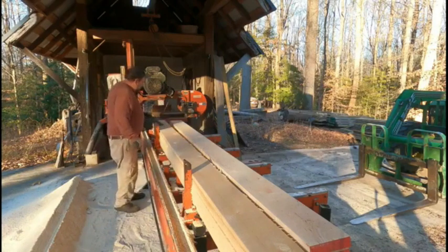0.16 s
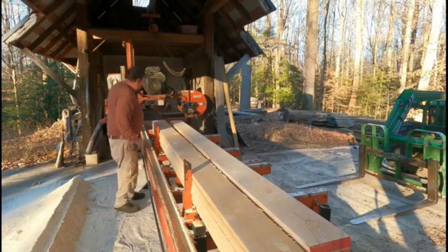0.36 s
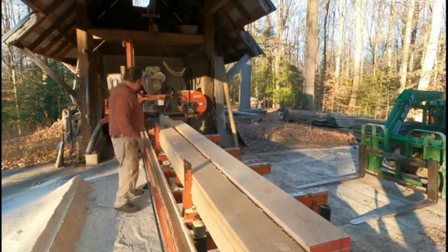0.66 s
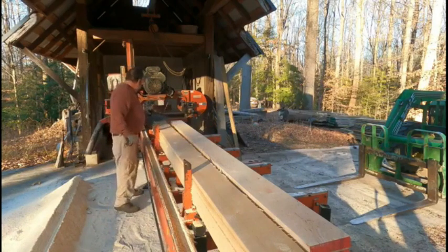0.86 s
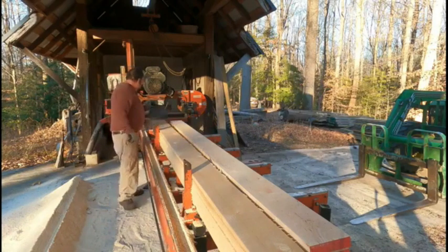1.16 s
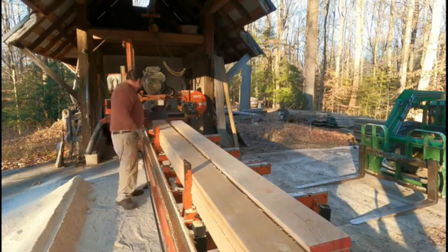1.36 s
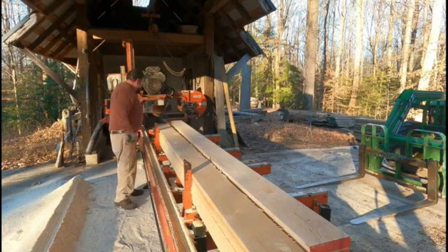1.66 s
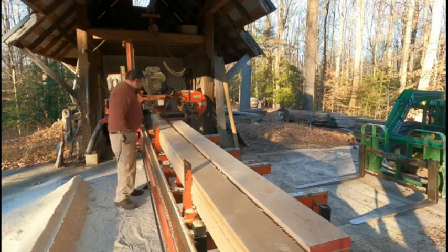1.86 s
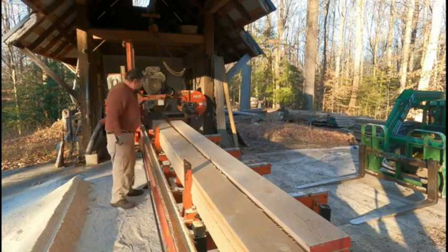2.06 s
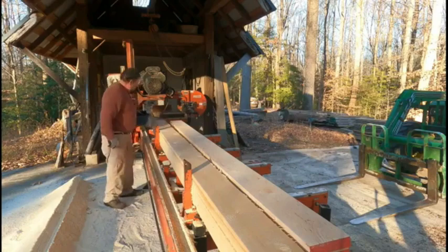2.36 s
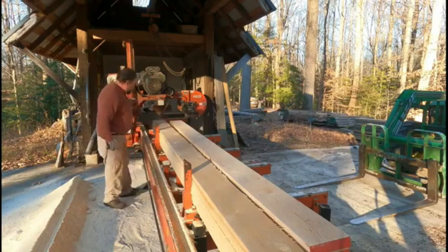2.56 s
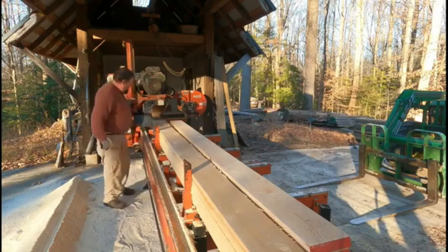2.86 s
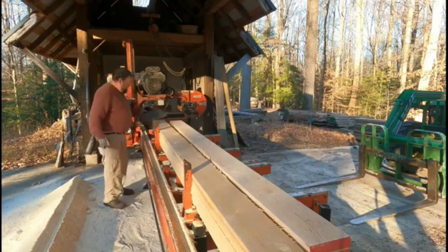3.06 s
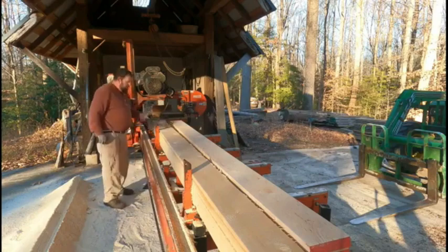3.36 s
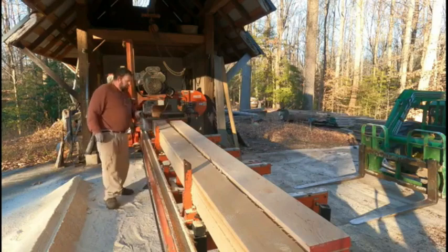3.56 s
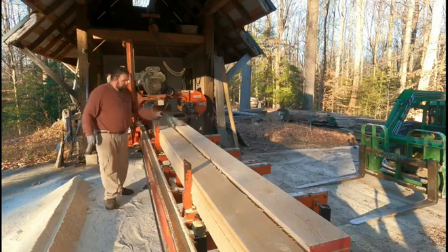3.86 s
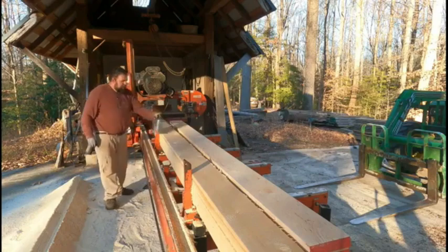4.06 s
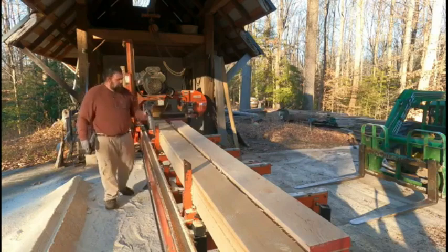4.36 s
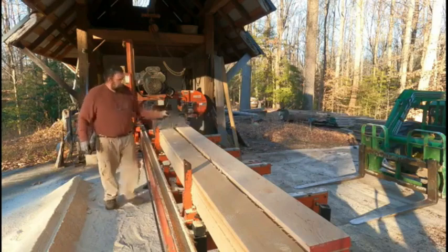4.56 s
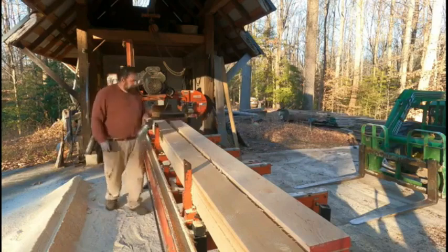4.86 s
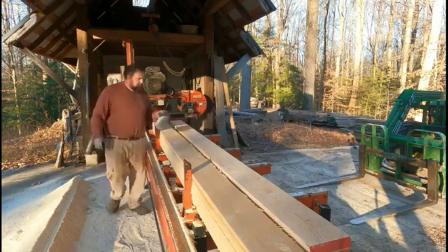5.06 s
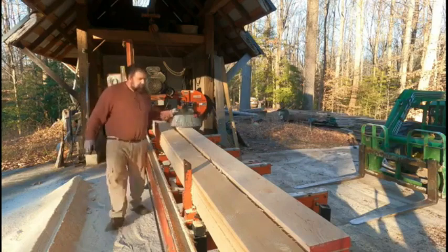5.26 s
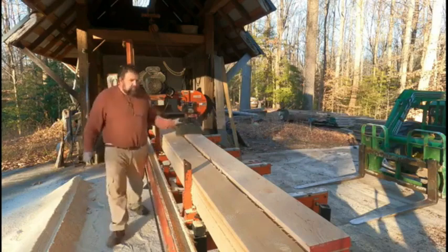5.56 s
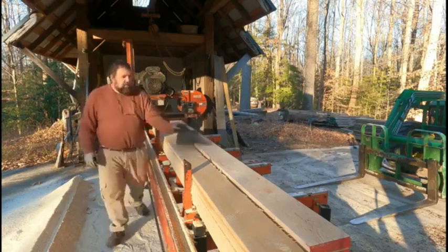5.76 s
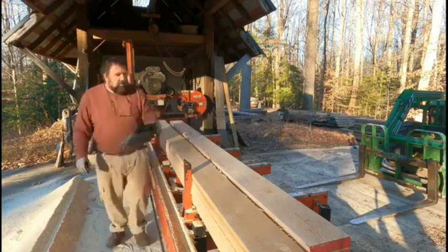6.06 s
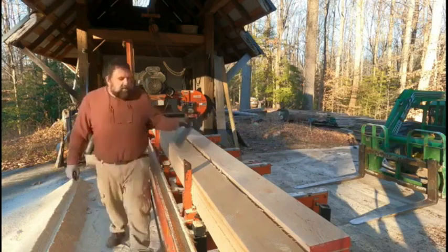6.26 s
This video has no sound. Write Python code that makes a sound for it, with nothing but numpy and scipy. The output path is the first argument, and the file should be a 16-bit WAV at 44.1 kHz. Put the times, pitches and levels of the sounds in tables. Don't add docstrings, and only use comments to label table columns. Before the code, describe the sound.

Outdoors by an open shed in quiet woods, a hand-held blade scrapes sawdust off a long sawn timber. About ten short strokes come irregularly, each opening with a woody knock and small bounces, then fizzing, rasping dust and light chatter. Soft boot scuffs fall between. Late on come a tiny squeak and dry snaps. The microphone hears it fairly close, with short faint echoes over breeze and distant drone.

```python
import sys
import numpy as np
from scipy import signal
from scipy.fft import rfft, irfft, next_fast_len
from scipy.io import wavfile
from scipy.ndimage import uniform_filter1d

SR = 44100
rng = np.random.default_rng(int(sys.argv[2]) if len(sys.argv) > 2 else 0)


def convert_level_to_amplitude(level_db):
    exponent = np.asarray(level_db, float) / 20
    return 10 ** exponent


def master(y):
    cut = np.clip(np.atleast_2d(y).T, -1, 1)
    pcm = np.round(cut * 32767)
    wavfile.write(sys.argv[1], SR, pcm.astype(np.int16))


N = 281799

# touch t/s, lift t/s, full-speed dust level/dB, rasp re dust/dB, chatter re dust/dB
STROKES = [(0.152, 0.346, -50, 2, -3), (0.762, 1.052, -46, 3, -2), (1.142, 1.377, -64.5, 17.5, 6.5),
           (1.592, 1.891, -50.5, -6.5, -9.5), (2.244, 2.457, -48, 2, -5), (2.762, 2.98, -53, 2.5, -1.5),
           (3.281, 3.555, -49.5, 4, -0.5), (3.971, 4.205, -48, 4, -2.5), (4.539, 4.666, -60, -6.5, -30),
           (4.768, 4.96, -46, 2.5, 1), (5.492, 5.986, -46, -1, -9)]
# start t/s, end t/s, dust level/dB, rasp re
# dust/dB, chatter re dust/dB
PUSHES = [
    (0.8, 0.95, -59, 12, 5),
    (1.07, 1.17, -77, 13, 10),
    (3.0, 3.12, -80, 2, 6.5),
    (3.99, 4.15, -53, 1.5, -3),
    (4.21, 4.3, -62, -2, -3),
    (4.29, 4.36, -73, -7, -4.5),
    (5.53, 5.7, -55, -4, -9),
    (5.88, 6.0, -48, -4, -5.5),
    (0.26, 0.35, -55, 3, -2),
]
# touch t/s, lift t/s, dust level/dB, rasp re dust/dB, chatter re dust/dB
SIFTS = [(0.025, 0.156, -95.5, 10, 22.5), (0.653, 0.77, -80, 2, 2), (1.434, 1.612, -79.5, 11, 9.5),
         (2.104, 2.25, -84.5, 11, 10), (2.742, 2.777, -79.5, 17, 18), (3.247, 3.284, -86.5, 9, 15),
         (3.71, 3.817, -83.5, -2.5, -10), (3.542, 3.713, -74, -1, 2.5), (4.4, 4.567, -85.5, 4, -4),
         (5.034, 5.065, -68, 10.5, 2.5), (5.08, 5.2, -78, 5.5, 2), (5.245, 5.314, -79.5, 4, 10),
         (5.3, 5.47, -82.5, -1, 2), (6.06, 6.2, -68, 10, 3), (6.153, 6.275, -80.5, -8, 3),
         (6.272, 6.346, -81.5, 1, -11), (6.341, 6.388, -82, 3, 7)]
# t/s, length/s, rasp level/dB, chatter level/dB, groan level/dB
JUDDERS = [(0.93, 0.043, -77, -63, -93), (1.0, 0.012, -55, -72, -86), (1.33, 0.085, -87.5, -69.5, -61),
           (1.8, 0.09, -46.5, -51.5, -89), (2.29, 0.046, -48.5, -54.5, -50), (3.465, 0.03, -48, -51, -65),
           (3.56, 0.027, -79, -87, -62.5), (4.19, 0.025, -64, -66, -54.5),
           (4.64, 0.08, -65.5, -68.5, -65.5), (4.785, .012, -85, -67, -53.5), (4.825, 0.015, -60, -54, -50),
           (4.895, 0.04, -50, -52, -55.5), (5.95, 0.063, -50, -54.5, -64), (6.12, 0.07, -70, -65, -59),
           (4.28, 0.036, -70, -83, -60.5), (5.045, 0.025, -74, -83, -64), (0.18, 0.032, -58, -55, -54),
           (4.03, 0.049, -61, -64, -64)]
# t/s, length/s, level/dB
HUMS = [
    (1.63, 0.018, -48),
    (4.0, 0.02, -64),
    (4.838, 0.01, -46),
    (4.9, 0.03, -50),
    (0.96, 0.035, -62),
    (2.25, 0.019, -56),
]
# t/s, blow level/dB, low modes level/dB, high modes level/dB, edge tick level/dB
TAPS = [(0.14, -27.5, -33, -4, -11.5), (0.751, -37.5, -45, -24, -27), (1.587, -19, -29, -14, -30),
        (2.186, -60, -25, -5, -15), (2.231, -20.5, -43, -10, -13.5), (2.761, -26, -24.5, -16.5, -13),
        (3.278, -24.5, -25.5, -24.5, -30), (3.971, -28.5, -15.5, -31, -15), (4.551, -65, -24, 3, 9.5),
        (4.696, -23, -12, -18.5, -11.5), (4.809, -25, -29, -26, -18), (5.477, -32.5, -13, -40, -9.5)]
# t/s, blow level/dB, low modes level/dB, high modes level/dB, edge tick level/dB
GRAZES = [
    (1.582, -29, -37, -8, -26),
]
# t/s, level/dB, f/Hz
BOUNCES = [(0.1422, -43.6, 1485), (0.1427, -41.0, 2411), (0.1487, -38.9, 1593), (0.1556, -41.5, 1550),
           (0.1566, -39.7, 1098), (0.1641, -41.1, 1098), (0.1701, -41.2, 1636), (0.7553, -43.4, 1205),
           (0.7603, -45.2, 1119), (0.7707, -49.6, 1291), (1.5889, -38.3, 2325), (1.5904, -25.1, 1141),
           (1.5929, -39.1, 2002), (1.5969, -35.0, 1399), (1.6004, -33.8, 1119), (1.6059, -30.9, 1055),
           (1.6118, -30.8, 1055), (1.6248, -35.5, 1055), (1.6318, -36.6, 1119), (2.2319, -36.0, 1636),
           (2.2324, -41.7, 3014), (2.2324, -32.9, 2024), (2.2374, -30.0, 1184), (2.2384, -40.6, 2045),
           (2.2489, -38.2, 1076), (2.7642, -45.7, 2411), (2.7657, -34.2, 1184), (2.7712, -43.8, 1701),
           (2.7777, -42.1, 1442), (2.7827, -39.4, 1055), (3.2795, -44.3, 2347), (3.28, -33.6, 1442),
           (3.29, -41.4, 1012), (3.2965, -42.5, 1399), (3.2965, -41.5, 1012), (3.4482, -39.1, 1894),
           (3.4766, -36.9, 1571), (3.4896, -38.8, 1571), (3.9725, -40.2, 1378), (3.974, -39.2, 990),
           (3.977, -39.6, 732), (3.9854, -41.9, 1184), (4.0074, -41.5, 1055), (4.6943, -40.4, 925),
           (4.6998, -35.5, 645), (4.7008, -36.9, 1119), (4.7033, -37.1, 1722), (4.7118, -37.9, 1550),
           (4.7193, -36.6, 1614), (4.8131, -36.0, 1658), (4.8225, -33.5, 1614), (4.836, -33.2, 990),
           (4.8445, -33.5, 1012), (4.8779, -38.0, 2196), (4.8799, -33.0, 1141), (4.8894, -34.0, 1033),
           (4.8994, -35.1, 1033), (4.9083, -34.5, 1033), (5.479, -38.5, 1184), (5.4835, -43.2, 581)]
# t/s, level/dB, f/Hz
TOUCHES = [(0.048, -67, 1350), (0.075, -66, 1440), (2.187, -62, 1340), (2.227, -52, 2100),
           (2.757, -56, 1320), (3.268, -58, 1130), (3.468, -40, 1600), (4.553, -62, 1760),
           (4.922, -38, 1500), (5.2501, -57, 1313), (5.2595, -56, 2060), (5.261, -60, 1421),
           (5.4845, -46, 1500), (5.491, -42, 1100), (5.505, -46, 1250), (6.076, -58, 1560),
           (6.364, -69, 1500), (1.5865, -30, 1200), (1.6175, -35, 1150), (1.642, -39, 1150),
           (1.598, -41, 2900), (1.609, -42, 2250), (4.8125, -38, 1150), (4.826, -39, 1050),
           (4.705, -47, 3700), (4.715, -42, 800), (4.745, -48, 700), (3.283, -42, 880), (5.515, -48, 900),
           (5.53, -50, 800), (0.146, -48, 3900), (2.269, -42, 1200), (4.19, -52, 380), (4.63, -56, 680),
           (4.717, -46, 2900), (4.735, -46, 950), (1.583, -46, 1700), (1.604, -40, 2600),
           (0.187, -44, 1150), (3.998, -44, 1400), (1.813, -40, 1600)]
# t/s, peak level/dB, length/s
SNAPS = [
    (5.034, -33, 0.0012),
    (6.1096, -27, 0.0018),
    (4.5525, -48, .001),
]
# t/s, length/s, heel thud level/dB, scuff level/dB
STEPS = [(0.2, 0.064, -51, -73), (0.94, 0.2, -69, -72.5), (1.38, 0.15, -91, -67), (1.67, 0.042, -56.5, -68),
         (1.87, 0.03, -57.5, -88), (2.29, 0.05, -60.5, -50.5), (2.43, 0.28, -62.5, -85),
         (3.33, 0.044, -66, -60), (3.62, 0.042, -60.5, -99), (4.21, 0.046, -68, -58.5),
         (4.62, 0.078, -68, -77), (4.71, 0.035, -79, -59.5), (4.92, 0.079, -57, -61),
         (5.08, 0.12, -61, -80), (5.61, .07, -57.5, -98), (5.97, 0.19, -71.5, -64.5),
         (6.16, 0.059, -58.5, -71)]
# t/s, length/s, level/dB
GUSTS = [(0.21, 0.19, -55), (1.04, 0.044, -58), (1.4, 0.031, -57), (1.67, 0.054, -59), (1.87, 0.023, -49.5),
         (2.33, 0.06, -59.5), (3.25, .07, -60), (3.61, 0.064, -57), (4.1, 0.084, -56), (4.34, 0.045, -58),
         (4.66, .07, -60), (4.92, 0.031, -56), (5.07, 0.049, -73), (5.6, 0.12, -63), (5.96, 0.16, -67.5),
         (0.75, 0.28, -64)]

# f/Hz, level/dB, t60 share of the ring
TIMBER = [(1004, 1, 1.9), (925, -4.5, 1.9), (1144, -14, 0.3), (1202, 5.5, 1), (1230, 0.5, 1.3)]
# f/Hz, level/dB, t60 share of the ring
TIMBER_LOW = [(495, -3, 0.25), (540, -4.5, 0.35), (584, 7, 1), (690, 18.5, 0.68), (768, -6, .6),
              (816, 5, .6)]
# f/Hz, level/dB, t60 share of the ring
TIMBER_MID = [(1316, -3.5, 1), (1340, -1.5, 0.29), (1564, 2.5, 0.3), (1481, 6, 0.36), (1700, -12, 0.86),
              (1776, 13, 0.31)]
# f/Hz, level/dB, t60 share of the ring
TIMBER_HIGH = [(1930, 5, 1), (2068, 10, 0.81), (2290, 13, 0.76), (2510, -2, 1), (2666, -1.5, 1.7),
               (2900, 2, 1), (3570, -19, 0.5)]

# f/Hz, level/dB per Hz
FIZZ = [(3500, -24.5), (4800, -8), (6700, -6), (7800, -11), (9200, -22), (11000, -38), (13500, -58)]
# f/Hz, level/dB per Hz
RASP = [(1400, -59), (1900, 0.5), (2400, -2.5), (3000, -2.5), (3700, -5), (4600, -13.5), (6000, -35),
        (9000, -69)]
# f/Hz, level/dB per Hz
SPARKLE = [(7500, -49), (9000, -5.5), (10500, -4), (12100, -4.5), (13200, -9), (14300, -15), (15500, -27)]
# f/Hz, level/dB per Hz
CHATTER = [(600, -74), (820, -12), (1000, 3.5), (1300, 6), (1600, 7), (1800, 2.5), (2300, -26), (5000, -62)]
# f/Hz, level/dB per Hz
GROAN = [(380, -11.5), (500, -0.5), (670, 1.5), (830, -10), (1000, -34.5)]
# f/Hz, level/dB per Hz
HUM = [(900, -37), (975, -3), (1005, -4), (1040, -1), (1120, -53)]
# f/Hz, level/dB per Hz
TICK = [(1500, -28), (3000, -9), (5500, 14), (7500, 8), (10000, -6), (15000, -34.5)]
# f/Hz, level/dB
KNOCK_CUT = [(600, -36), (930, 0), (3200, 0), (4300, -24)]
# f/Hz, level/dB
LOW_CUT = [(280, -36), (470, 0), (900, 0), (1300, -20)]
# f/Hz, level/dB per Hz
SNAP = [(900, -30), (1600, 0), (3000, 5.5), (6500, 0), (9000, -20), (15000, -40)]
# f/Hz, level/dB per Hz
SCUFF = [(80, -37), (150, -3), (230, 7.5), (300, 12), (420, 4.5), (560, -85)]
# f/Hz, level/dB per Hz
THUD = [(45, -32), (62, 18.5), (100, 6), (135, 11.5), (170, -37.5)]
# f/Hz, t60/s
SHED = [(300, 0.18), (1000, 0.18), (3000, 0.1), (8000, 0.074), (15000, 0.24)]
# f/Hz, level/dB
SIDEWAYS = [(200, -9.5), (600, -1.5), (1200, -5.5), (2500, 4.5), (5000, 0.5), (9000, -1.5), (13000, -0.5)]
# f/Hz, left re right/dB
BALANCE_DB = [(60, -23.5), (110, -1.5), (200, -4), (380, -2), (700, -1.2), (1290, 0.0), (2380, 0),
              (4400, 0.0), (8120, 2), (15000, -0.5)]
# f/Hz, level/dB per Hz
BUFFET = [(10, -13), (22, 22.5), (35, 23.5), (55, 17), (75, -49.5)]
# f/Hz, level/dB per Hz
AIR = [(90, -18), (125, -20.5), (160, 15), (215, -19), (330, -10), (560, -16), (800, -20), (1250, -17),
       (1900, -26), (3900, -33.5), (5600, -29), (7400, -36), (9500, -45), (13000, -76.5)]
# f/Hz, correlation
AIR_SAME = [(60, 1), (130, 1), (290, 0.28), (640, 0.11), (1410, 0.14), (3100, 0.18), (6820, 0.71),
            (15000, 0.057)]

# (top as share of stroke, climb/dB, sag/dB)
DUST_ARCH, RASP_ARCH, CHATTER_ARCH = (0.95, 19.8, 3.7), (0.76, 30, 3.5), (0.62, 30, 4.3)
SIFT_ARCH = (0.54, 9.8, 7.3)
ARCH_POWER, TOUCH_S = 2.15, 0.0079
LIFT_DB_PER_S, TRICKLE_DB, TRICKLE_DB_PER_S = 312, -41.5, 102
# (level/dB at a -27 dB blow, share of blow dB, fall/dB per s)
SETTLE_DUST, SETTLE_RASP = (-66.5, 1, 290), (-48.5, 0.72, 224)
SETTLE_CHATTER, SETTLE_GROAN = (-43, 0.6, 260), (-41.5, 0.21, 160)


def evened(x):
    return x / np.sqrt(np.mean(x ** 2) + 1e-20)


def read(points, hz):
    f, value = np.transpose(points)
    return np.interp(np.log(hz + 1), np.log(f + 1), value)


def add(mix, s, sound):
    part = mix[round(s * SR):][:len(sound)]
    part += sound[:len(part)]


def colour(x, points, share=1):
    length = x.shape[-1]
    size = next_fast_len(length)
    gain = convert_level_to_amplitude(share * read(points, np.fft.rfftfreq(size, 1 / SR)))
    return irfft(rfft(x, size) * gain, size)[..., :length]


def swells(rows, column):
    t = np.arange(0, N, 32) / SR
    slow = sum(convert_level_to_amplitude(row[column]) * np.exp(-((t - row[0]) / row[1]) ** 2) for row in rows)
    return np.interp(np.arange(N) / SR, t, slow)


def stroked(rows, arch, column):
    top, climb_db, sag_db = arch
    out = np.zeros(N)
    for row in rows:
        length = row[1] - row[0]
        t = np.arange(0, length + .5, 1 / SR)
        u, after = np.minimum(t / length, 1), np.maximum(t - length, 0)
        climb = -climb_db * abs(1 - u / top) ** ARCH_POWER
        sag = -sag_db * ((u - top) / (1 - top)) ** 2
        arc_db = np.where(u < top, climb, sag)
        lift = convert_level_to_amplitude(-LIFT_DB_PER_S * after) + convert_level_to_amplitude(TRICKLE_DB - TRICKLE_DB_PER_S * after)
        over_db = row[column] if column > 2 else 0
        add(out, row[0], convert_level_to_amplitude(row[2] + over_db + arc_db) * lift * np.minimum(t / TOUCH_S, 1))
    return out


def moving(arch, column):
    return np.hypot(stroked(STROKES, arch, column), stroked(list(PUSHES) + list(SIFTS), SIFT_ARCH, column))


def settling(rule, low_share=0):
    db, share, fall_db_per_s = rule
    out, t = np.zeros(N), np.arange(0, .3, 1 / SR)
    for s, blow_db, low_db, *_ in TAPS:
        level_db = db + share * (blow_db + 27) + min(blow_db + 50, 0) + low_share * low_db
        add(out, s, convert_level_to_amplitude(level_db - fall_db_per_s * t) * np.minimum(t / TOUCH_S, 1))
    return out


def louder(modes, by_db):
    return [(hz, db + by_db, share) for hz, db, share in modes]


def ring(modes, t60_s, strike_db, detune):
    hz, db, share = np.transpose(modes)[:, :, None]
    t = np.maximum(np.arange(12000) / SR - .001, 0)
    decay = convert_level_to_amplitude(db + strike_db[:, None] - 60 * t / (share * t60_s))
    return (decay * np.sin(2 * np.pi * hz * detune[:, None] * t)).sum(0)


def grit(per_s, spread_db, clump_db, clump_s):
    size = convert_level_to_amplitude(spread_db * np.minimum(rng.exponential(1, N), 5)) * rng.standard_normal(N)
    clumps = evened(uniform_filter1d(rng.standard_normal(N), max(int(clump_s * SR), 2)))
    return size * (rng.random(N) < per_s / SR) * convert_level_to_amplitude(clump_db * clumps)


def dust_grains():
    fizz = moving(DUST_ARCH, column=2) + settling(SETTLE_DUST) + convert_level_to_amplitude(-99)
    rasp = moving(RASP_ARCH, column=3) + settling(SETTLE_RASP) + swells(JUDDERS, column=2)
    dust = grit(14000, 0.51, 0.8, 0.015)
    grains = fizz * evened(colour(dust, FIZZ)) + convert_level_to_amplitude(-4.44) * rasp * evened(colour(dust, RASP))
    finest = convert_level_to_amplitude(-13.5) * fizz * (fizz / convert_level_to_amplitude(-48.5)) ** 0.32
    return grains + finest * evened(colour(dust, SPARKLE))


def blade_chatter():
    steady = moving(CHATTER_ARCH, column=4)
    shake = steady + settling(SETTLE_CHATTER) + swells(JUDDERS, column=3)
    flex = convert_level_to_amplitude(-26) * steady + settling(SETTLE_GROAN, low_share=0.54)
    flex = flex + swells(JUDDERS, column=4) + convert_level_to_amplitude(-88.5)
    slips = grit(5000, 1.1, 0.82, 0.012)
    modes = list(TIMBER) + list(TIMBER_MID)
    body = ring(modes, 0.23, np.zeros(len(modes)), np.ones(len(modes)))
    rung = colour(signal.oaconvolve(slips, body)[:N], CHATTER, 0.37)
    chatter = evened(colour(slips, CHATTER)) + 0.18 * evened(rung)
    groan = convert_level_to_amplitude(-4.5) * flex * evened(colour(slips, GROAN))
    hum = swells(HUMS, column=2) * evened(colour(slips, HUM))
    return shake * evened(chatter) + groan + hum


def taps(contact_s=0.0033, settle_s=0.039, ring_s=0.025):
    out, rows, count = np.zeros(N), list(TAPS) + list(GRAZES), len(TIMBER_LOW)
    total = count + len(TIMBER) + len(TIMBER_MID) + len(TIMBER_HIGH)
    spots = rng.standard_normal((len(rows), 2, total))
    rough = rng.standard_normal((len(rows), 2, 4096))
    t = np.arange(4096) / SR
    blow = (t / contact_s * np.exp(1 - t / contact_s)) ** 2
    landing = blow + 0.5 * np.exp(-t / settle_s) * (1 - np.exp(-t / contact_s))
    tick_shape = np.exp(-t / 0.016) * (1 - np.exp(-t / 0.0073))
    fade = np.hanning(18000)[9000:]
    for (s, db, low_db, high_db, tick_db), (strike, tune), (a, b) in zip(rows, spots, rough):
        strike_db, detune = 2.4 * strike, 1 + 0.0099 * tune
        mid = louder(TIMBER_MID, 3 + 0.75 * high_db)
        stiff = list(TIMBER) + mid + louder(TIMBER_HIGH, high_db + 8.0)
        deep = ring(louder(TIMBER_LOW, low_db + 4), ring_s, strike_db[:count], detune[:count])
        high = ring(stiff, ring_s, strike_db[count:], detune[count:])
        modes = colour(high, KNOCK_CUT) + colour(deep, LOW_CUT)
        knock = signal.fftconvolve(a * landing, modes[:9000] * fade)
        tick = colour(b * tick_shape, TICK)[:3400]
        add(out, s - .0035, convert_level_to_amplitude(db - 9) * knock / abs(knock).max())
        add(out, s - .0004, convert_level_to_amplitude(db + tick_db - 4.6) * tick / abs(tick).max())
    return out


def bounces(rise_s=.0021, level_db=1):
    out, rows, u = np.zeros(N), list(BOUNCES) + list(TOUCHES), np.arange(1200) / SR / rise_s
    swell = (u * np.exp(1 - u)) ** 1.7
    for (s, db, hz), (phase, sag) in zip(rows, rng.random((len(rows), 2))):
        turns = np.cumsum(hz * (1 - .02 * sag * (u - 1))) / SR + phase
        add(out, s - .8 * rise_s, convert_level_to_amplitude(db + level_db) * swell * np.sin(2 * np.pi * turns))
    return out


def snaps():
    out, t = np.zeros(N), np.arange(2048) / SR
    for (s, db, length), crack in zip(SNAPS, rng.standard_normal((len(SNAPS), 2048))):
        snap = colour(crack * np.exp(-t / max(length, .0003)), SNAP)[:1400]
        add(out, s - .0005, convert_level_to_amplitude(db - 5.5) * snap / abs(snap).max())
    return out


def squeak(at_s=5.2475, level_db=-64, from_hz=1250, to_hz=2150, length_s=.024):
    out, t = np.zeros(N), np.arange(2048) / SR
    u = np.clip(t / length_s, 0, 1)
    turns = np.cumsum(from_hz + (to_hz - from_hz) * np.minimum(u / .5, 1)) / SR
    wobble = .9 + .7 * evened(colour(rng.standard_normal(len(t)), [(350, 0), (900, -50)]))
    partials = [(1, 0), (.62, -7), (1.42, -15)]
    tones = sum(convert_level_to_amplitude(db) * np.sin(2 * np.pi * ratio * turns) for ratio, db in partials)
    add(out, at_s, convert_level_to_amplitude(level_db) * tones * wobble * np.sin(np.pi * u ** .6) ** .6)
    return out


def boot_scuffs():
    return (swells(STEPS, column=3) + convert_level_to_amplitude(-77)) * evened(colour(grit(3000, 1.0, 3.4, 0.044), SCUFF))


def shed(x):
    echoes = np.zeros((2, 22000))
    at = np.arange(120, 21980, 20) + rng.integers(0, 20, (2, 1093))
    np.put_along_axis(echoes, at, rng.choice([-1., 1.], at.shape), 1)
    hz, t, z = signal.stft(echoes, SR, nperseg=256)
    t60_s = np.maximum(read(SHED, hz), .02)[:, None]
    tail = signal.istft(z * convert_level_to_amplitude(-60 * t / t60_s), SR, nperseg=256)[1]
    shared, opposed = signal.fftconvolve(x[None], tail / np.linalg.norm(tail[0]), axes=1)[:, :N]
    return shared + np.array([[1], [-1]]) * colour(opposed, SIDEWAYS)


def breeze_and_heels():
    both, *own = rng.standard_normal((3, N))
    push = both + .12 * np.array(own)
    buffet = np.hypot(swells(GUSTS, column=2), convert_level_to_amplitude(-68)) * evened(colour(push, BUFFET))
    return buffet + np.hypot(swells(STEPS, column=2), convert_level_to_amplitude(-71)) * evened(colour(push, THUD))


def woods():
    frames, hz = N // 256 + 5, np.fft.rfftfreq(1024, 1 / SR)
    a, b, c, d, patches = rng.standard_normal((frames, 513, 5)).T
    patches = evened(uniform_filter1d(uniform_filter1d(patches, 8, axis=0), 16, axis=1))
    same = np.clip(read(AIR_SAME, hz), -1, 1)[:, None]
    left = a + 1j * b
    right = same * left + np.sqrt(1 - same ** 2) * (c + 1j * d)
    z = np.array([left, right]) * convert_level_to_amplitude(read(AIR, hz)[:, None] + 0.69 * patches)
    return convert_level_to_amplitude(-65.5) * evened(signal.istft(z, nperseg=1024, noverlap=768)[1][:, :N])


def scene():
    work = dust_grains() + blade_chatter() + taps() + bounces() + snaps() + squeak() + boot_scuffs()
    near = work + convert_level_to_amplitude(-10) * shed(work)
    sided = np.array([colour(near[0], BALANCE_DB, .5), colour(near[1], BALANCE_DB, -.5)])
    return sided + breeze_and_heels() + woods()


def roll_off(x):
    return signal.sosfilt(signal.butter(12, 15660, fs=SR, output="sos"), x)


def record(dry):
    edge = signal.firwin(511, 14980, window=("kaiser", 9), fs=SR)
    mix = signal.oaconvolve(dry, edge[None], "same")
    return roll_off(mix)


dry = scene()
out = record(dry)
master(out)
```